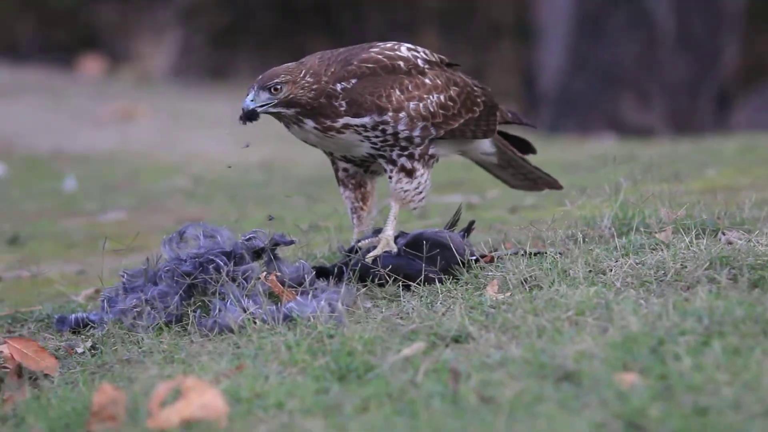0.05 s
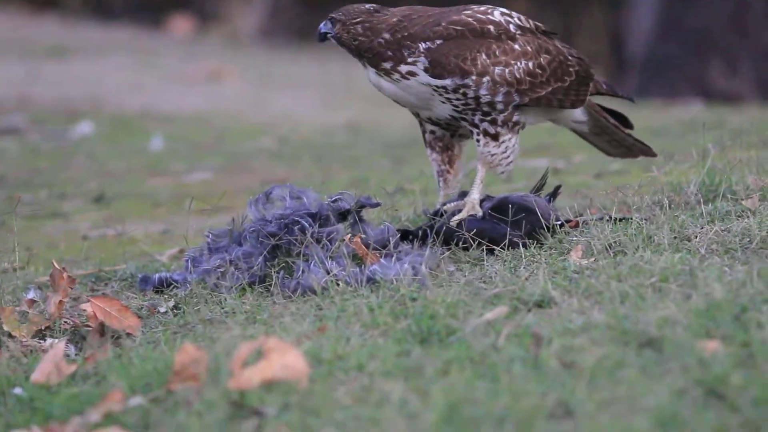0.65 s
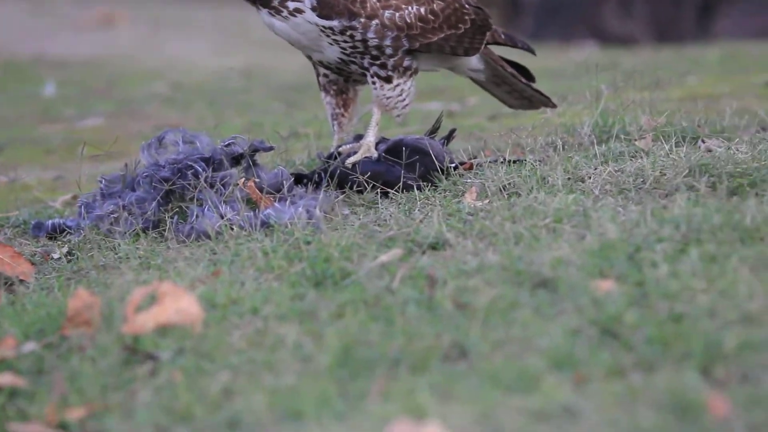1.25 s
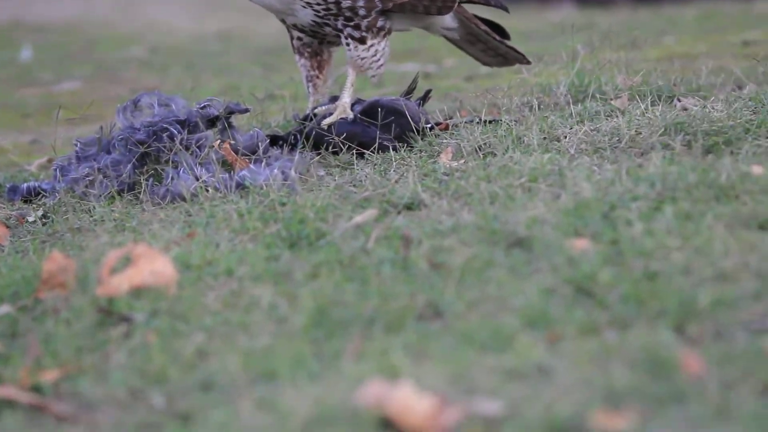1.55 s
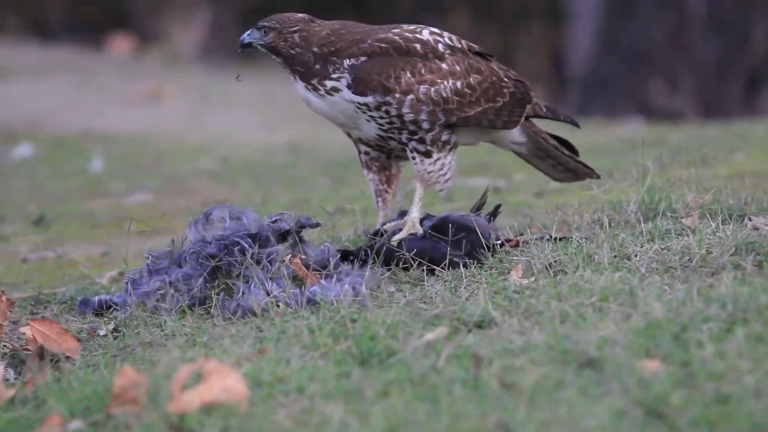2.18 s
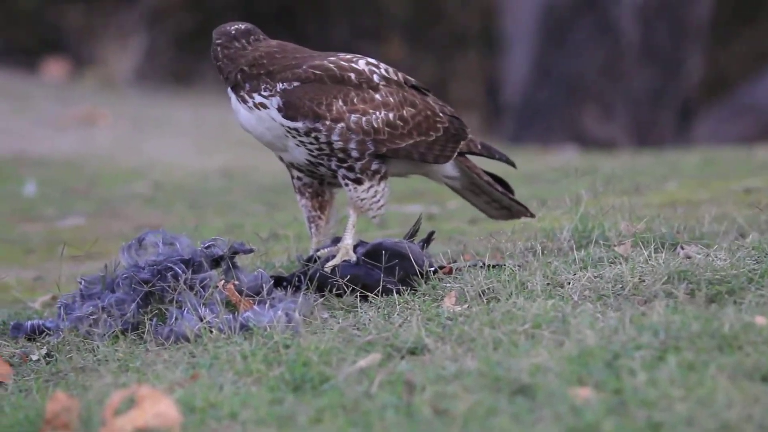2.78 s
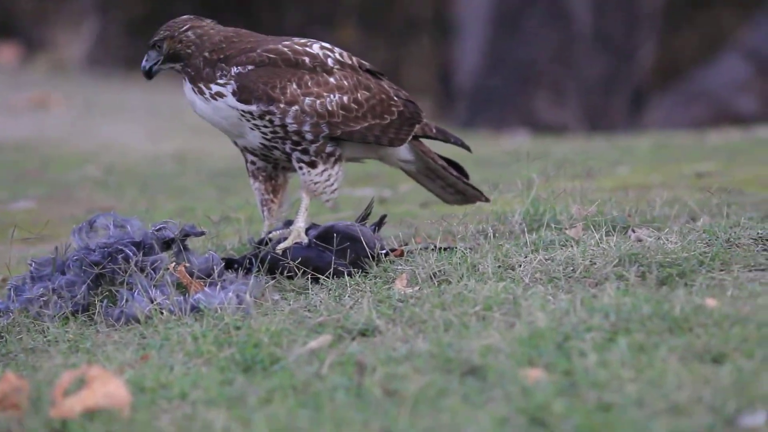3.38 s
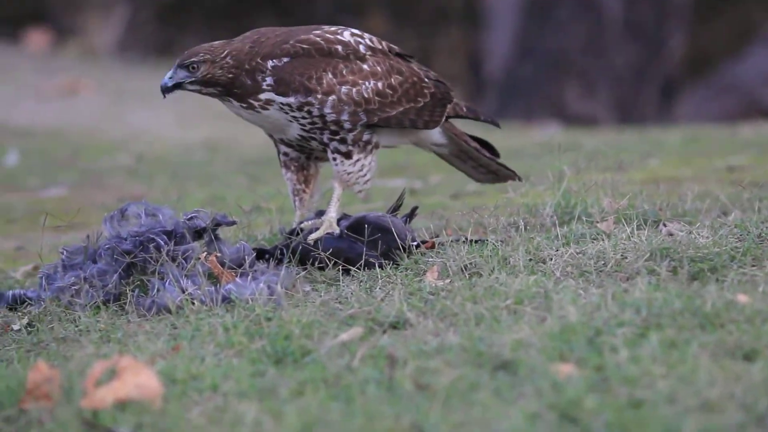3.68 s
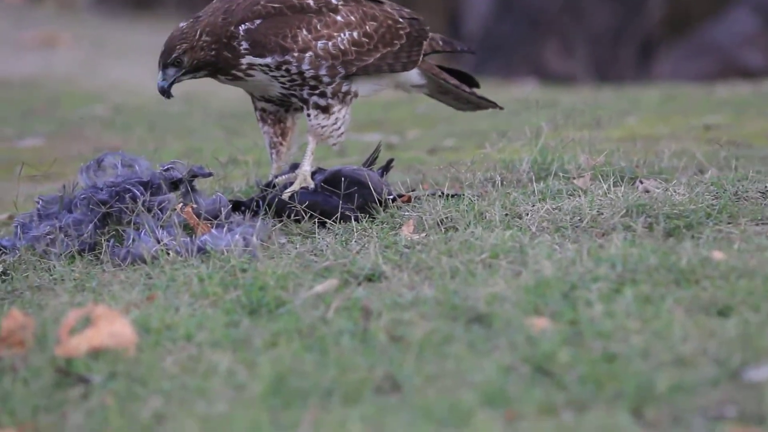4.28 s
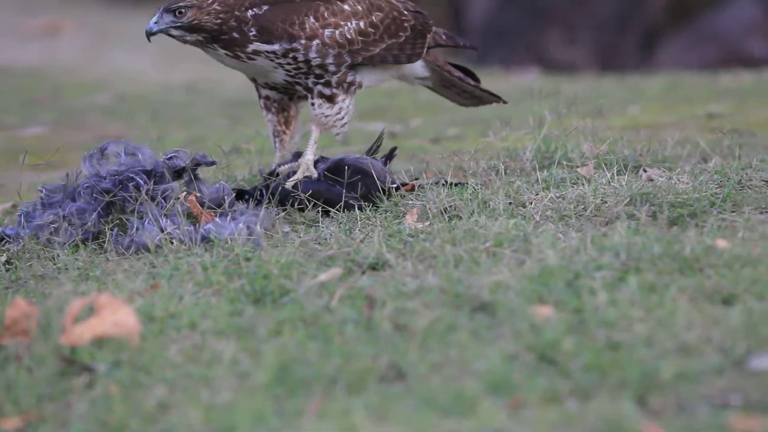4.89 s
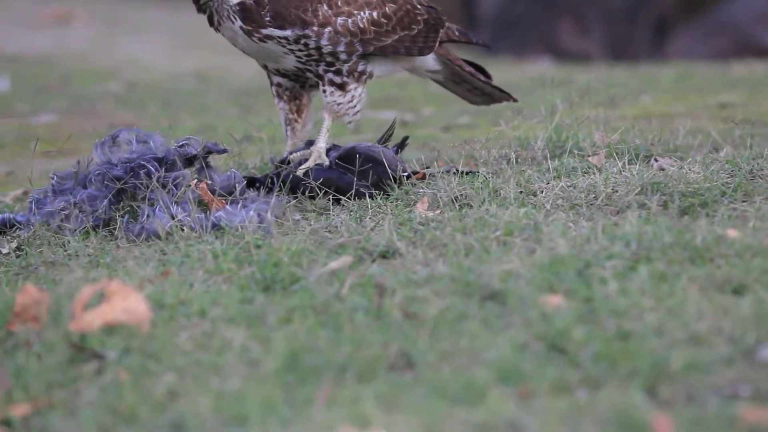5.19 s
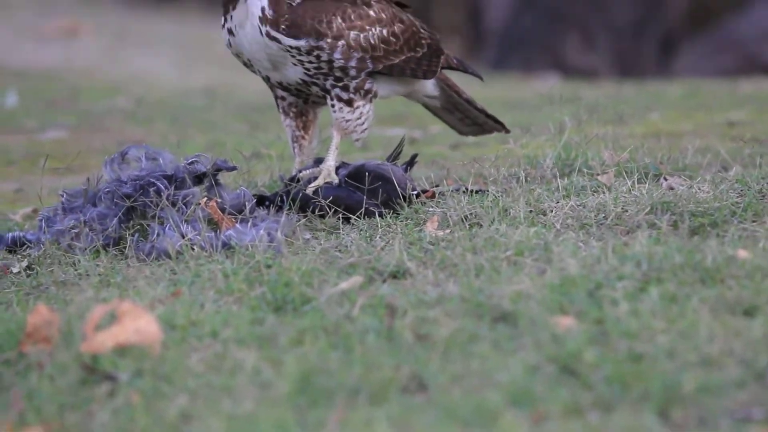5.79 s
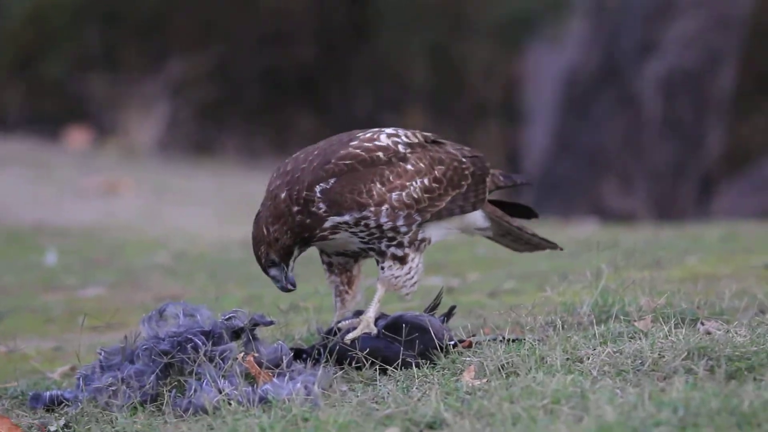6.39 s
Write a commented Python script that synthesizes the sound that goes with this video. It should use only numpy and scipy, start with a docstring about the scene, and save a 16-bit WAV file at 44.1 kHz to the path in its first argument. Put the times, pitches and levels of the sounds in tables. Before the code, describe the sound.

On an open lawn, distant traffic rumbles under a faint engine drone. Right at the microphone, a small hard casing shifts in a hand, rubbing and creaking, with one very loud snap and a sharp tick early on. The clicks thin out, then return in a second cluster of creaks and dry snaps past the middle. A small bird gives a few quick, high chips from the trees.

```python
"""A lawn, with traffic rumbling far off and a distant engine droning at its firing rate.
A small bird chips, its quick whistles scattered by the trees. Up close a small hard housing shifts in
the hand: the grip rubs, sticks and slips, ringing it in creaks and dry snaps, with a few bare ticks.
The loudest snap overloads the microphone and ducks the background."""
import sys
import numpy as np
from scipy import signal
from scipy.fft import rfft, irfft, next_fast_len
from scipy.io import wavfile

SR = 44100
rng = np.random.default_rng(int(sys.argv[2]) if len(sys.argv) > 2 else 0)


def to_wav(sig):
    """Store sig (one row per channel, or 1-D mono) as 16-bit WAV at the path in sys.argv[1].

    Samples outside -1..1 are clipped; the rate is SR.
    """
    pcm = np.clip(np.atleast_2d(sig), -1, 1) * 32767
    pcm = np.round(pcm).astype(np.int16)
    wavfile.write(sys.argv[1], SR, pcm.T)  # frames by channels


N = 293265
TIME = np.arange(N) / SR

# EQ of the traffic bed: (frequency [Hz], gain [dB])
TRAFFIC_EQ = [(22, -20.5), (40, -10), (60, -6.5), (115, -2), (170, -8), (240, -12), (330, -18), (520, -19),
              (750, -16.5), (1050, -15), (1700, -23), (2500, -34), (4200, -43.5), (10000, -51.5),
              (16000, -59.5)]
# squeals and moans in the traffic: (time [s], length [s], from [Hz], to [Hz], width [Hz], level [dB])
SQUEALS = [(0.418, .3, 1734, 1710, 200, -47.5), (0.769, .25, 1700, 1790, 200, -50),
           (1.1, 0.97, 3140, 3120, 70, -68.5), (2.154, 0.48, 3020, 2960, 80, -65),
           (2.322, 0.25, 992, 1002, 30, -49), (2.451, 0.53, 252.4, 301.5, 29.6, -50),
           (3.102, 0.94, 330, 431.4, 90, -54), (4.901, 0.91, 330.7, 434, 110, -51),
           (5.855, 0.72, 639, 721, 111, -50)]
# fader curve of the engine's firing tone: (time [s], gain [dB])
FIRING_FADER = [(0, -36.5), (.45, -32), (.7, -36.5), (1, -35.5), (2.1, -41.5), (2.95, -53), (3.7, -39),
                (4.4, -39.5), (5.15, -39), (5.6, -39.5), (6.6, -44.5)]
# the engine's upper partials: (order [multiple of the cycle rate])
UPPER_ORDERS = (16, 17, 20, 24)
# each of those partials between swells: (level [dB])
UPPER_LEVELS = (-61, -62.5, -62.5, -61)
# spells when they carry better: (centre [s], half length [s], boost [dB], delay per order [s])
ENGINE_SWELLS = [(3.544, 0.46, 11, .068), (5.3, 0.43, 8, 0)]
# bird chips: (time [s], length [s], from [Hz], to [Hz], peak before dry/wet split [dB], dry share [0-1])
BIRD_CHIPS = [(1.401, 0.013, 4600, 6660, -49, .1), (3.007, 0.013, 5180, 6560, -44, 0.1),
              (3.308, 0.012, 3530, 6630, -43, 0.4), (3.322, 0.013, 4780, 5560, -35.5, 1),
              (5.656, 0.014, 4300, 6500, -47.5, .1), (6.07, 0.01, 4400, 6660, -43, 0.3),
              (6.572, .02, 4700, 7000, -55, 1), (6.582, 0.017, 4100, 5950, -46, 0.8)]
# modes of the housing: (frequency [Hz], gain [dB], t60 [s])
HOUSING_MODES = [(1410, -16, 0.024), (1896, -12, 0.022), (3235, -8, 0.024), (3570, -8, 0.026),
                 (3820, -12, 0.024), (4503, -5.5, 0.017), (4805, 2, 0.014), (5030, -10.5, 0.034),
                 (5390, -17, 0.0094), (7070, -11.5, 0.031), (8800, -3.5, 0.0082), (8760, -2.5, 0.021),
                 (9450, 3.5, 0.006), (10460, -9, 0.027), (11800, -11, .01), (13140, -13, 0.0088)]
# EQ of the crack that starts every slip: (frequency [Hz], gain [dB])
CRACK_EQ = [(400, -22), (1400, -6.5), (2600, -11), (3400, 0.5), (4100, -7), (4800, 3.5), (6100, -9),
            (8000, 1.5), (9300, -2), (12500, -1.5), (16000, -12.5)]
# EQ of the rubbing hiss: (frequency [Hz], gain [dB])
RUB_EQ = [(1000, -41.5), (3300, -8), (4200, -5.5), (4800, 2), (5700, -10), (7200, -2), (9300, 0.5),
          (10400, -3), (11800, -9), (16000, -20.5)]
# strokes of soft rubbing: (centre [s], half length [s], level [dB])
RUB_STROKES = [(.33, .07, -61), (.62, .09, -51.5), (1.0, .11, -61), (1.33, .08, -68), (1.64, .14, -64),
               (4.62, .15, -68), (6.28, .11, -66.5)]
# EQ of a tick: (frequency [Hz], gain [dB])
TICK_EQ = [(100, 6), (500, 1), (1300, 9.5), (4500, 6.5), (7000, 3), (10800, -1.5), (12500, -33),
           (16000, -91)]
# dry ticks: (time [s], peak [dB], ring [Hz], ring t60 [s], ring against pulse [dB])
DRY_TICKS = [(.9901, 1, 3570, 0.008, -21), (1.163, -18, 4000, 0.011, -10), (2.075, -29, 2600, .006, -3.5),
             (5.9336, -23, 8800, 0.005, -4), (5.9675, -10.5, 2470, 0.013, -19)]
# creaking tugs: (release time [s], lead [s], tail [s], level before trim [dB], treble over mid [dB])
GRIP_TUGS = [(.174, 0.029, 0.012, -38, -10.5), (0.5005, 0.027, 0.02, -33.5, -9),
             (0.5282, .014, 0.0096, -28.5, -8), (.689, 0.028, .011, -20.5, 0.5),
             (0.922, .018, 0.01, -31.5, -5), (0.9645, .013, 0.018, -32.5, -1),
             (1.073, .025, 0.017, -49, -14), (1.541, 0.0049, 0.014, -43.5, 0),
             (1.6627, 0.015, 0.014, -39, 4), (2.22, 0.028, 0.031, -36.5, 3),
             (2.4662, .024, 0.034, -39.5, 4.5), (3.546, .014, 0.0088, -48, -18),
             (3.593, 0.0078, 0.018, -41, -6), (4.0758, 0.014, .016, -32, -4.5),
             (4.1188, 0.00097, 0.013, -36.5, -7.5), (4.181, 0.0074, .024, -29.5, -11),
             (4.2111, .003, .008, -25, -11), (4.3555, 0.00038, 0.0337, -40, 2),
             (4.4138, 0.011, 0.0095, -38.5, -2), (4.448, 0.00068, .014, -31, 2.5),
             (4.6752, .025, .028, -27.5, 2), (4.747, .018, .012, -36.5, 2),
             (4.807, 0.022, 0.025, -37.5, -4.5), (4.8745, 0.016, .007, -37.5, -6),
             (5.5505, 0.044, 0.019, -40, -3.5), (5.598, 0.0063, .016, -47.5, -8)]
# lone snaps: (time [s], attack level [dB], treble over mid [dB])
LONE_SNAPS = [(0.487, -34, -3), (.714, -30, -3), (0.9111, -31.5, -7), (1.147, -42, 1), (2.0619, -50, 3),
              (2.5964, -45.5, 8), (3.034, -48.5, -3), (3.3786, -49, 0), (3.6621, -44, -11),
              (4.037, -42.5, -13), (4.276, -40.5, 4), (4.314, -29, -4.5), (4.3293, -43, 5),
              (4.486, -48.5, -2), (4.5707, -43.5, 4), (4.6227, -29.5, 12.5), (4.694, -26, 13),
              (4.7941, -30, 2), (5.109, -54, 0), (5.153, -52.5, -4), (6.2137, -51.5, 0)]
# the one hard snap: (time [s], attack level [dB], treble over mid [dB])
HARD_SNAP = (.6603, -6.5, -3)


def amp(db):
    """Decibels to gain."""
    return 10 ** (np.asarray(db) / 20)


def unit(x):
    """Scales to rms 1."""
    return x / np.sqrt(np.mean(x ** 2) + 1e-20)


def eq_gain(eq, hz):
    """Gain of an EQ curve at the frequencies hz."""
    points_hz, db = np.transpose(eq)
    return amp(np.interp(np.log(hz + 1), np.log(points_hz + 1), db))


def add(mix, s, sound):
    """Mixes a sound in at s seconds."""
    part = mix[max(round(s * SR), 0):][:len(sound)]
    part += sound[:len(part)]


def noise(eq, samples=N):
    """Steady noise through an EQ curve, rms 1."""
    size = next_fast_len(samples)
    spectrum = rfft(rng.standard_normal(size)) * eq_gain(eq, np.fft.rfftfreq(size, 1 / SR))
    return unit(irfft(spectrum, size)[:samples])


def drift(per_s):
    """Slow random wander, rms 1."""
    knots = rng.standard_normal(2048)
    return unit(np.interp(TIME * per_s, np.arange(len(knots)), knots))


def swell(centre, half_length):
    """A smooth rise to 1 and fall."""
    return np.exp(-((TIME - centre) / half_length) ** 2)


def traffic(level_db=-38, swell_db=0.9):
    """Far roads: an even bed of rumble and roar that swells slightly."""
    return amp(level_db + swell_db * drift(1.3)) * noise(TRAFFIC_EQ)


def traffic_squeals():
    """Faint squeals and moans: narrow bands of noise that swell, glide and fade."""
    out = np.zeros(N)
    for s, length, from_hz, to_hz, width_hz, db in SQUEALS:
        hz = np.linspace(from_hz, to_hz, round(length * SR))
        lowpass = signal.butter(2, width_hz / 2, fs=SR, output="sos")
        a, b = signal.sosfilt(lowpass, rng.standard_normal((2, 2 * SR)))[:, -len(hz):]
        phase = 2 * np.pi * np.cumsum(hz) / SR
        band = unit(a * np.cos(phase) + b * np.sin(phase))
        add(out, s, amp(db) * band * signal.windows.tukey(len(hz), .7))
    return out


def engine(cycle_hz=21.09, wander=.002, firing_trim_db=-2.5, fade_db=3.0, throb_db=1.5):
    """A far engine firing four times a cycle: a low drone under partials that swell and fade."""
    cycles = np.cumsum(cycle_hz * (1 + wander * drift(4))) / SR

    def partial(order, db):
        peak = np.sqrt(2) * amp(db + throb_db * drift(14))
        return peak * np.sin(2 * np.pi * (order * cycles + rng.random()))

    upper = np.zeros(N)
    for order, db in zip(UPPER_ORDERS, UPPER_LEVELS):
        steps = order - UPPER_ORDERS[0]
        carry_db = sum(boost * swell(s + lag * steps, half) for s, half, boost, lag in ENGINE_SWELLS)
        upper += partial(order, db + carry_db + fade_db * drift(2))
    firing_db = firing_trim_db + np.interp(TIME, *np.transpose(FIRING_FADER))
    return partial(4, firing_db) + upper


def bird(t60=0.42, early_s=.012):
    """Fast whistled sweeps; the trees scatter them and leave the farther ones mostly reverb."""
    direct, send = np.zeros((2, N))
    for s, length, from_hz, to_hz, db, dry_share in BIRD_CHIPS:
        hz = np.linspace(from_hz, to_hz, round(length * SR))
        chip = amp(db) * signal.windows.tukey(len(hz), .5) * np.sin(2 * np.pi * np.cumsum(hz) / SR)
        add(direct, s, dry_share * chip)
        add(send, s, (1 - 0.73 * dry_share) * chip)
    t = np.arange(SR // 3) / SR
    decay = 2 * np.exp(-t / early_s) + amp(-60 * t / t60)
    trees = rng.standard_normal(len(t)) * decay
    return direct + signal.oaconvolve(send, trees / np.linalg.norm(trees))[:N]


def slip(scrape=0.89, detune=0.008, crack_db=4.5, heavy=False, crack_s=0.001, scrape_s=.0005):
    """A push and a tiny scrape ring the housing, a little differently at every contact point."""
    t = np.arange(1500) / SR
    hz, db, t60 = np.transpose(HOUSING_MODES)[:, :, None]
    if heavy:  # a heavy push favours the strongest modes and also drives the low ones
        db = 1.9 * db + 17 * (hz < 2500)
    shift, phase = rng.standard_normal((2, len(HOUSING_MODES), 1))
    modes = amp(db - 60 * t / t60) * np.sin(2 * np.pi * (hz * (1 + detune * shift) * t + phase))
    crack = amp(crack_db) * noise(CRACK_EQ, len(t)) * np.exp(-t / crack_s)
    attack = np.minimum(t * SR / 8, 1)
    body = (modes.sum(0) + crack) * attack
    grit = rng.standard_normal(300) * t[:300] * np.exp(-t[:300] / scrape_s)
    force = scrape * grit / np.linalg.norm(grit) + (1 - scrape) * signal.unit_impulse(len(grit))
    return np.convolve(body, force)[:len(t)]


def brighten(x, bright_db, crossover_hz=7300, rolloff_hz=13500):
    """Balances treble against mid: a sharper slip drives the upper modes harder."""
    spectrum, hz = rfft(x, 2 * len(x)), np.fft.rfftfreq(2 * len(x), 1 / SR)
    highpass = 1 / (1 + (crossover_hz / (hz + 1)) ** 14)
    rolloff = 1 / np.sqrt(1 + (hz / rolloff_hz) ** 12)
    mid, treble = (unit(irfft(spectrum * band)[:len(x)]) for band in (1 - highpass, highpass * rolloff))
    return mid + amp(bright_db) * treble


def rubbing(rest_db=-73.5, flicker_db=3.5, catch_db=-67.0, catches_per_s=70, spread_db=4.):
    """The grip is never quite still: a soft sliding hiss, with tiny catches that ring the housing."""
    level = amp(rest_db) + sum(amp(db) * swell(s, half) for s, half, db in RUB_STROKES)
    caught = rng.random(N) < catches_per_s / SR
    catches = caught * amp(spread_db * np.minimum(rng.exponential(1, N), 3))
    contact = rng.integers(0, 6, N)
    grains = sum(signal.oaconvolve(catches * (contact == k), slip())[:N] for k in range(6))
    hiss = level * noise(RUB_EQ) * amp(flicker_db * drift(73))
    return hiss + amp(catch_db) * unit(grains * level ** 0.91)  # catches grow more slowly than the hiss


def ticks(size=1024):
    """Dry ticks: each a sharp pulse with one short ring."""
    out = np.zeros(N)
    t = np.arange(size) / SR
    log_gain = np.log(eq_gain(TICK_EQ, abs(np.fft.fftfreq(size, 1 / SR))))
    pulse = np.fft.ifft(np.exp(np.conj(signal.hilbert(log_gain)))).real  # minimum phase: a hard attack
    for s, db, hz, t60, ring_db in DRY_TICKS:
        ring = amp(ring_db - 60 * t / t60) * np.sin(2 * np.pi * hz * t)
        tick = pulse / abs(pulse).max() + ring
        add(out, s, -amp(db) * tick / abs(tick).max())
    return out


def creak(length, bright_db, gap_s=.0036, uneven_db=4.):
    """Stick and slip: tension builds and lets go at uneven gaps of a few milliseconds."""
    length = max(length, gap_s)
    run = np.zeros(round(length * SR) + 1500)
    waits, accents = rng.gamma(3, 1 / 3, 20), rng.standard_normal(20)
    onsets = gap_s * (np.cumsum(waits) - waits[0])
    slips = [slip() for _ in onsets]
    for s, accent, sound in zip(onsets, accents, slips):
        if s < length:
            add(run, s, amp(uneven_db * accent) * sound)
    return unit(brighten(run, bright_db)) * np.sqrt(length * SR / len(run))


def snap(hit, db, bright_db):
    """Voices one slip as a snap: sets its brightness, then its level over the first 4 ms."""
    hit = brighten(hit, bright_db)
    return amp(db) * hit / np.std(hit[:176])


def tugs(creak_trim_db=-8, release_trim_db=-2.5):
    """Each tug creaks around one stronger slip, where the contact lets go."""
    out = np.zeros(N)
    for s, lead, tail, db, bright_db in GRIP_TUGS:
        add(out, s - lead, amp(db + creak_trim_db) * creak(lead + tail, bright_db))
        add(out, s, snap(slip(scrape=.75), db + release_trim_db, bright_db))
    return out


def snaps():
    """The lone snaps, and the hard one: a clean, heavy push that sets every mode ringing."""
    out = np.zeros(N)
    for s, db, bright_db in LONE_SNAPS:
        add(out, s, snap(slip(scrape=.75), db, bright_db))
    s, db, bright_db = HARD_SNAP
    hard_hit = slip(scrape=0, detune=.002, crack_db=3, crack_s=.0013, heavy=True)
    add(out, s, snap(hard_hit, db, bright_db))
    return out


def scene():
    """The mono mix: close handling over the distant bed."""
    bed = traffic() + traffic_squeals() + engine() + bird()
    return (bed + rubbing() + tugs() + snaps() + ticks())[None]


def record(dry, threshold_db=-21.0, release_db_per_s=55.0, low_cut_hz=36, high_cut_hz=15750):
    """Overload, low cut, a limiter that ducks fast and recovers slowly, then a steep high cut."""
    x = np.clip(dry[0], -1.1, 1.1)
    x = signal.sosfilt(signal.butter(3, low_cut_hz, "high", fs=SR, output="sos"), x)
    pole = np.exp(-1 / (0.019 * SR))  # 19 ms smoothing
    power_db = 10 * np.log10(signal.lfilter([1 - pole], [1, -pole], x ** 2) + 1e-12)
    release_db = TIME * release_db_per_s
    held_db = np.maximum.accumulate(power_db + release_db) - release_db
    duck_db = signal.lfilter([1 - pole], [1, -pole], np.maximum(held_db - threshold_db, 0))
    high_cut = signal.firwin(301, high_cut_hz, window=("kaiser", 8), fs=SR)
    return signal.oaconvolve(x / amp(duck_db), high_cut, "same")[None]


dry = scene()
out = record(dry)
to_wav(out)
```